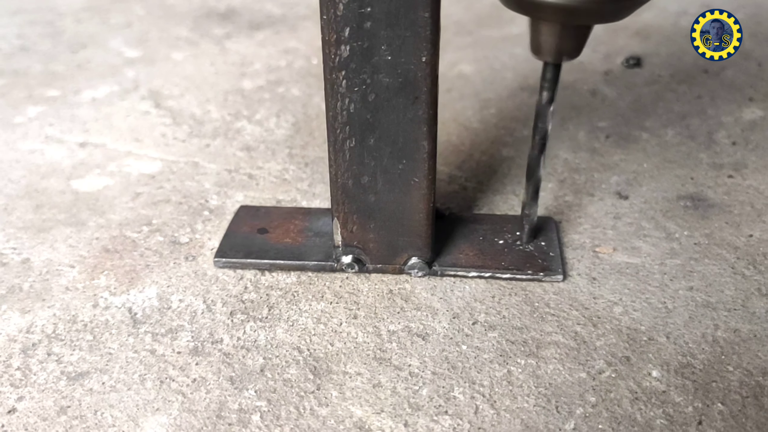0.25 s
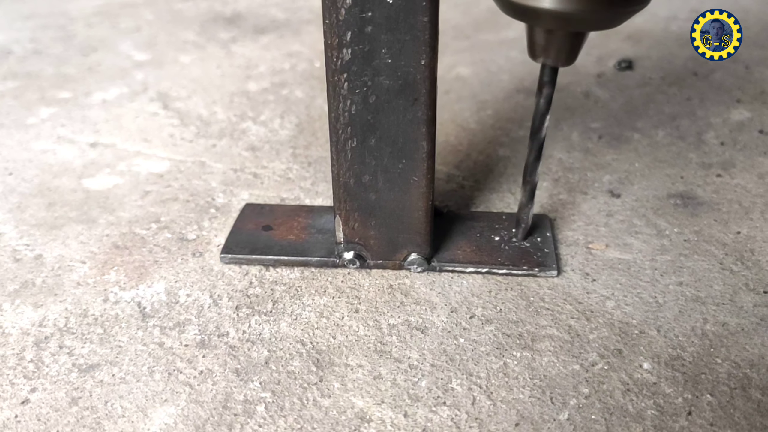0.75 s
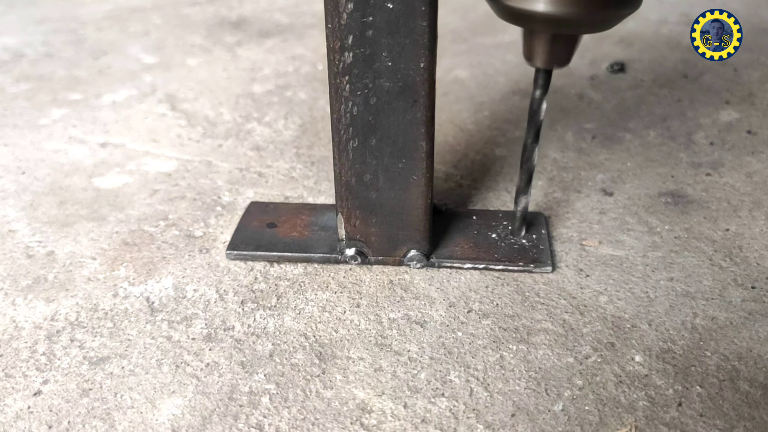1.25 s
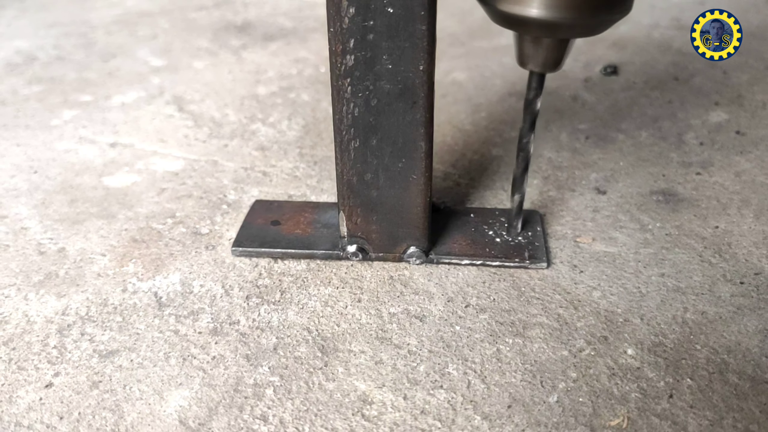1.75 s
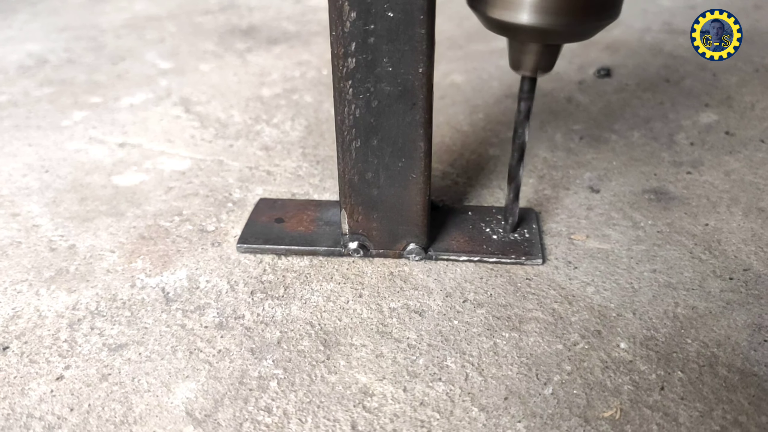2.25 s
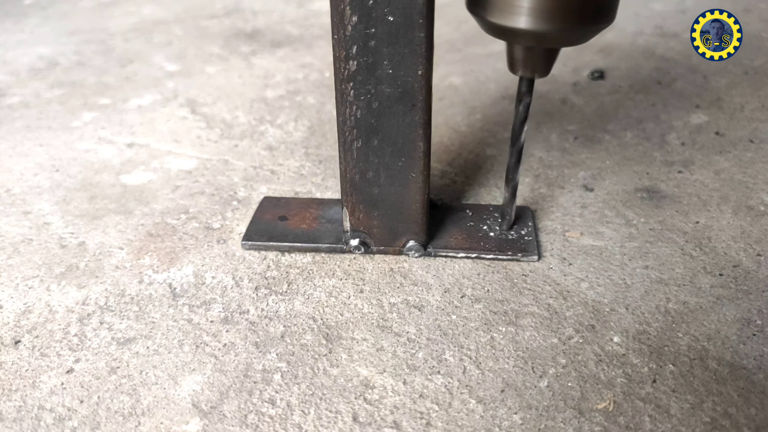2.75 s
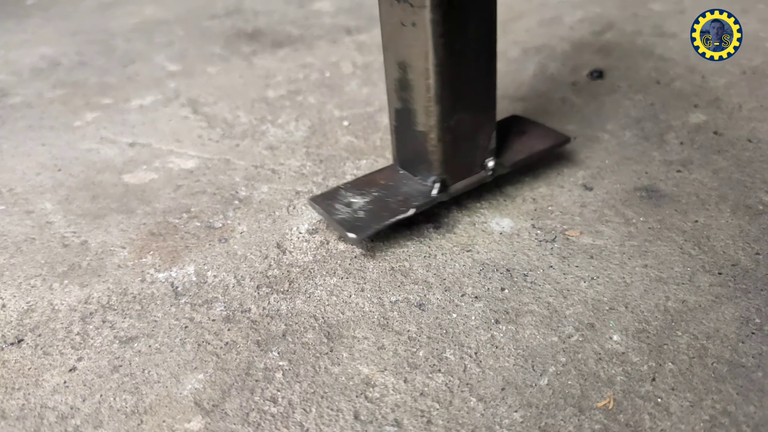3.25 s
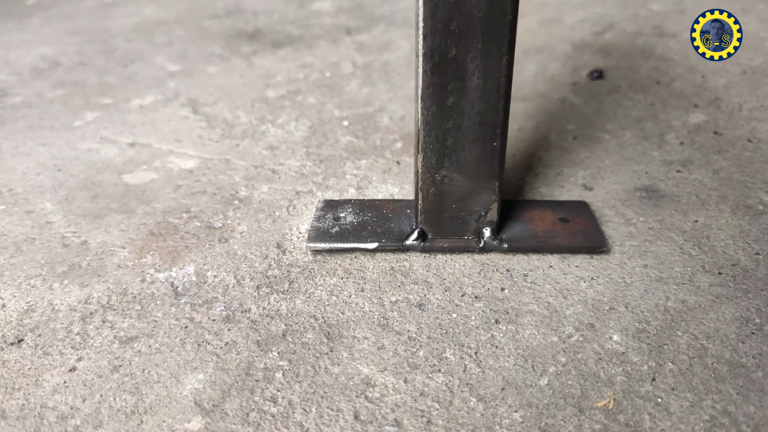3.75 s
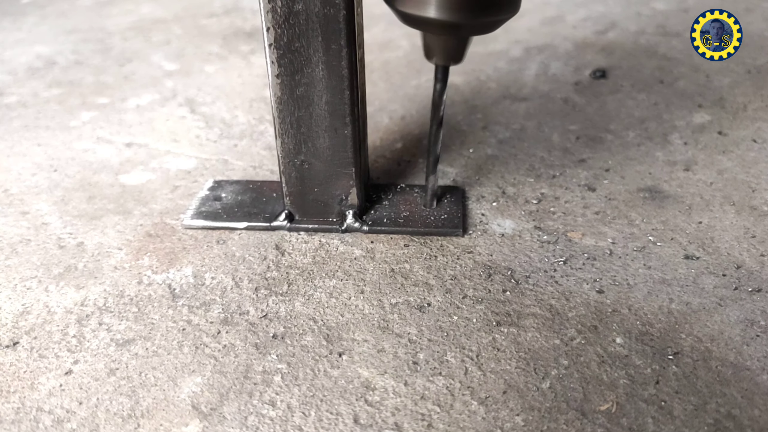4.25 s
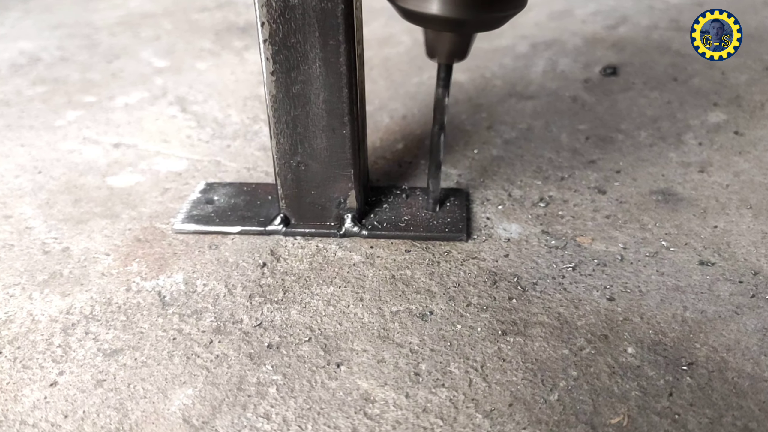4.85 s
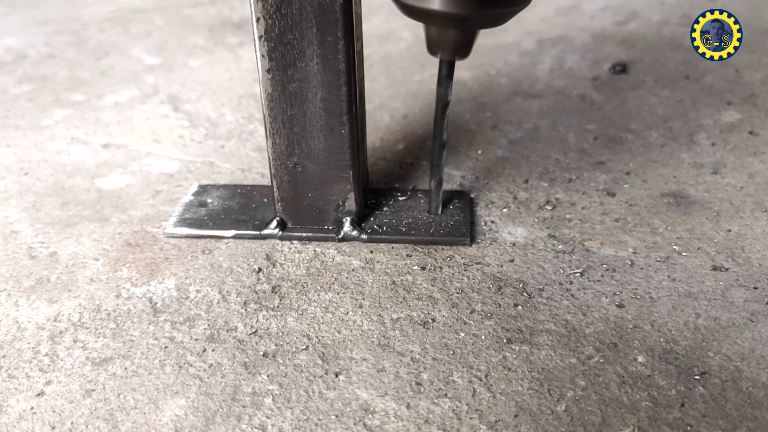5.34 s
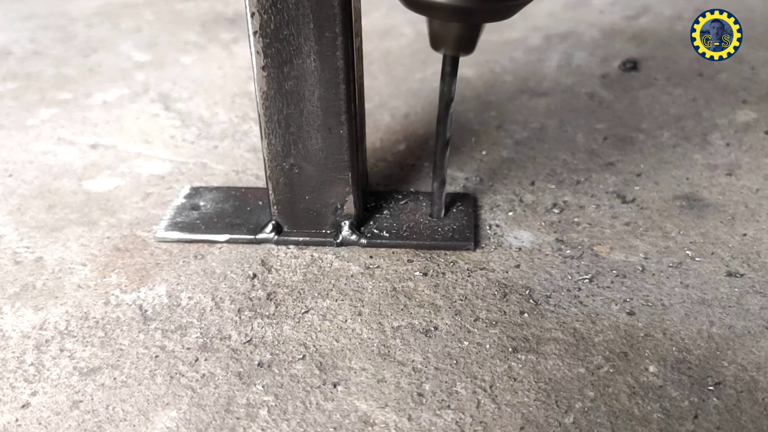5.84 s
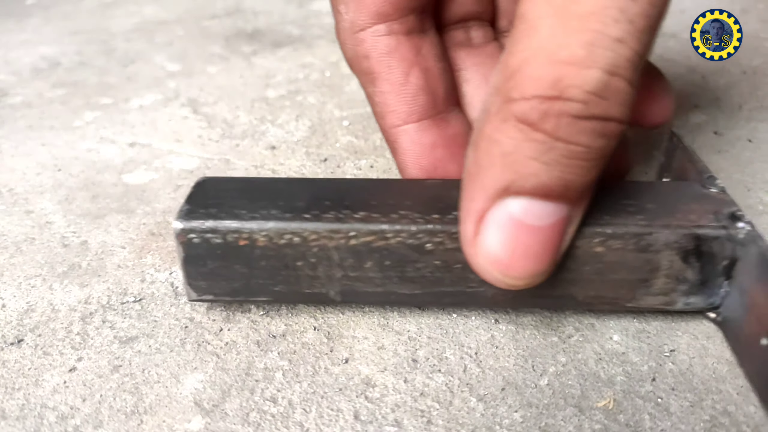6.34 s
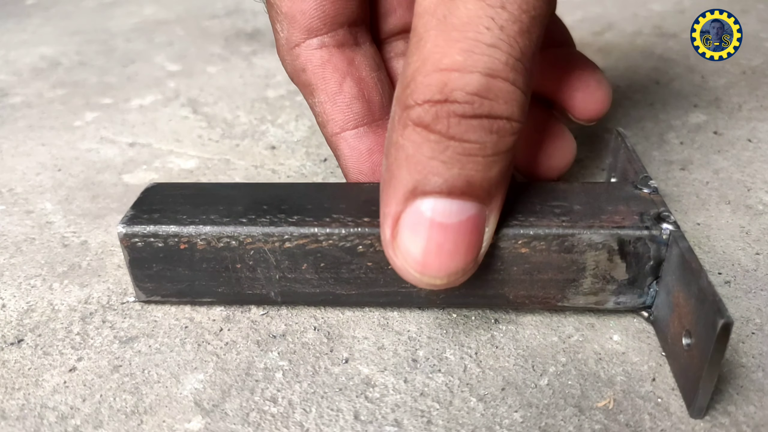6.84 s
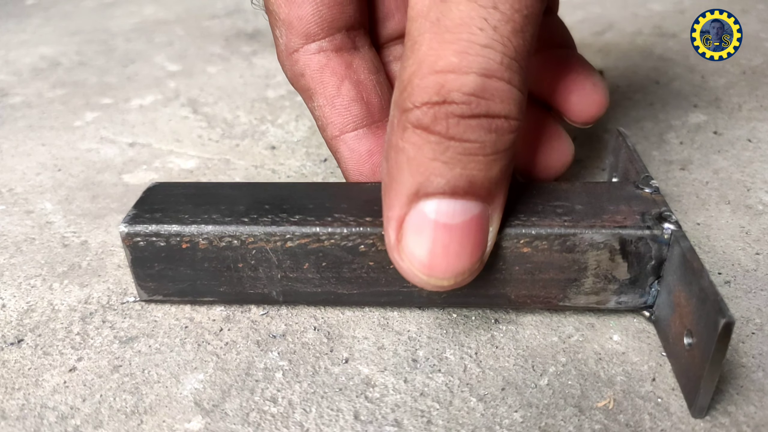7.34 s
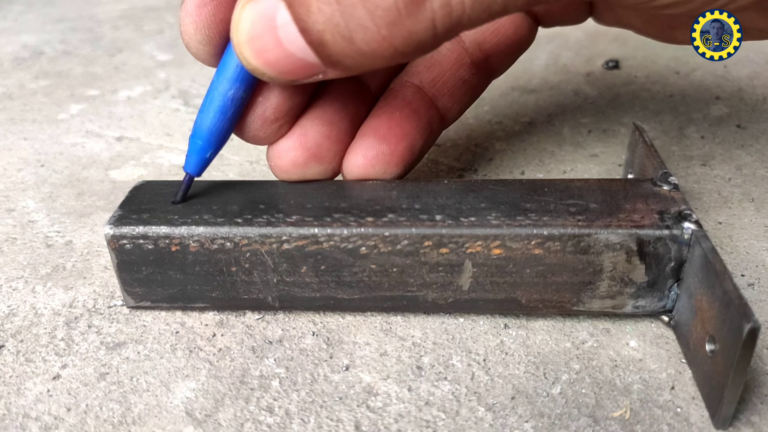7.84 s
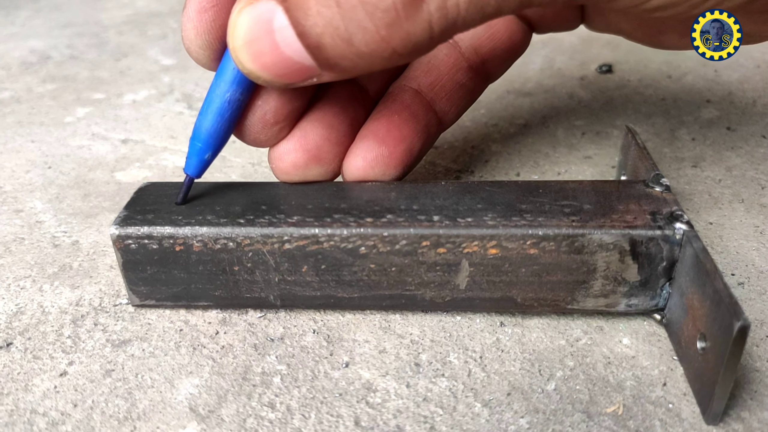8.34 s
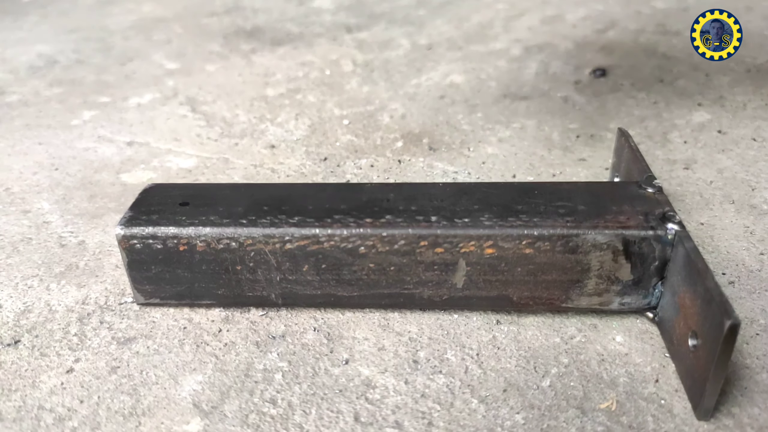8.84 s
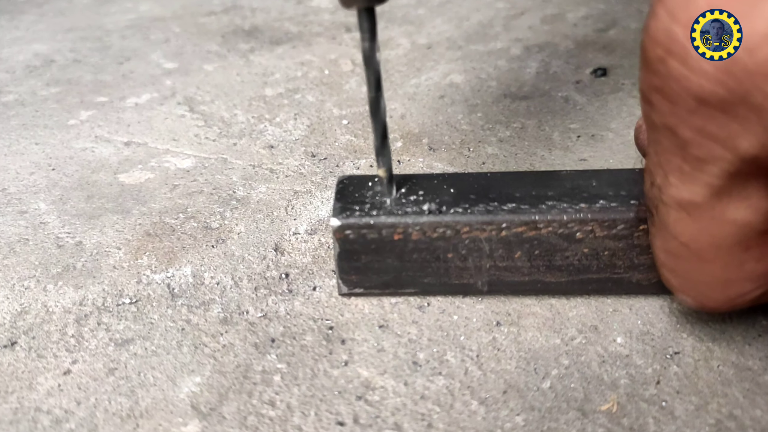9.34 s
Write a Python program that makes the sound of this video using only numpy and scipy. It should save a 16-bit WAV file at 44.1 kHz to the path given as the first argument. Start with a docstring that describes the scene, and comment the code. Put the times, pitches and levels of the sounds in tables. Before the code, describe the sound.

In a quiet workshop with faint hiss and low rumble, a mains hand drill close to the microphone bores steel with a steady whining roar. It cuts out, the piece knocks and rings on concrete, then a louder, faster, higher bore squeaks repeatedly. Sharp clacks follow, then near silence with a thin scrape, a faint distant whirr, and a third run-up cut off while turning.

```python
"""A quiet workshop, a two-port microphone close by: hiss and low rumble, then a handheld mains drill
bores a first hole in a welded steel piece on a concrete floor: rotor orders and whine over noise for the roar.
The piece is set down in cracks and rings; a faster second hole squeaks as the bit's edge slips.
More touches follow, a faint scrape with a thin squeal, and a far whirr with the answer of the walls.
The drill runs up into a third hole, with a singing tone and squeaks, and is still turning at the end."""
import sys
import numpy as np
from scipy import signal
from scipy.fft import rfft, irfft, next_fast_len
from scipy.io import wavfile
from scipy.ndimage import uniform_filter1d, map_coordinates

SR = 44100
rng = np.random.default_rng(int(sys.argv[2]) if len(sys.argv) > 2 else 0)


def dump(signal):
    """Clip the signal to [-1, 1] and save it as 16-bit WAV at the path in sys.argv[1]."""
    limited = np.clip(np.atleast_2d(signal).T, -1, 1)
    pcm = np.round(limited * 32767).astype(np.int16)
    wavfile.write(sys.argv[1], SR, pcm)


N = 422919  # samples


def amp(db):
    """dB to gain."""
    return 10 ** (np.asarray(db) / 20)


def unit(x):
    """x at rms 1."""
    return x / np.sqrt(np.mean(x ** 2) + 1e-20)


def along(points, hz):
    """(f/Hz, value) points read on a log frequency axis."""
    f, v = np.transpose(points)
    return np.interp(np.log(hz + 1), np.log(f + 1), v)


def sides(pan_db):
    """Left and right gains of a left-right difference, keeping their mean at 1."""
    pair = amp([pan_db / 2, -pan_db / 2])
    return pair / pair.mean(axis=0)


def wobble(rate, count):
    """A smooth random curve of count samples, rate knots a second."""
    knots = rng.standard_normal(int(count * rate / SR) + 4)
    return map_coordinates(knots, [np.arange(count) * rate / SR])


def filtered(x, response):
    """x times a response of frequency."""
    m = next_fast_len(x.shape[-1] + 8192)
    return irfft(rfft(x, m) * response(np.fft.rfftfreq(m, 1 / SR)), m)[..., :x.shape[-1]]


def rush(count, gain, alike, lean, patchy_db):
    """Stereo noise, mean of the ports at rms 1, with random gain in patches of time and frequency."""
    z = signal.stft(rng.standard_normal((2, count + 512)), nperseg=512)[2]
    field = uniform_filter1d(rng.standard_normal(z.shape[1:]), size=5, axis=0)
    field = uniform_filter1d(field, size=10, axis=1)
    pair = signal.istft(z * amp(patchy_db * unit(field)), nperseg=512)[1][:, :count]

    def shared_and_opposed(hz):
        # a noise common to both ports, and one of opposite sign in them, set the likeness
        turn = np.arccos(np.clip(along(alike, hz), -.95, .99)) / 2
        return gain(hz) * np.array([np.ones_like(hz), np.tan(np.minimum(turn, 1.1))])

    same, other = filtered(pair, shared_and_opposed)
    ports = np.array([same + other, same - other])
    both = filtered(ports, lambda hz: sides(along(lean, hz)))
    return both / np.std(both.mean(axis=0))


def placed(rows):
    """First sample, end sample, times and one value per sample for each column."""
    s, *cols = np.transpose(rows)
    start, stop = round(s[0] * SR), min(round(s[-1] * SR), N)
    t = np.arange(start, stop) / SR
    return start, stop, t, [np.interp(t, s, c) for c in cols]


def set_in(x, start, stop):
    """A stereo stretch at its place in the whole length."""
    return np.pad(x, ((0, 0), (start, N - stop)))


def tone(phase, pan_db, lead):
    """A tone of rms 1 in the mean of both ports, which hear it at different strength and phase."""
    pair = amp([pan_db / 2, -pan_db / 2]) * np.exp(.5j * np.array([lead, -lead]))
    return np.sqrt(2) * np.real((pair / abs(pair.mean()))[:, None] * np.exp(1j * phase))


def glide(rows, waver, pan_db, lead):
    """A single tone on a curve of pitch and level, its phase wavering."""
    start, stop, t, (hz, db) = placed(rows)
    phase = 2 * np.pi * np.cumsum(hz) / SR + waver * wobble(90, len(t))
    eased = amp(db) * signal.windows.tukey(len(t), .1)
    return set_in(eased * tone(phase, pan_db, lead), start, stop)


# spectrum shape of workshop and microphone hiss: (f/Hz, relative level/dB per Hz)
QUIET = [(12, -30.5), (20, -1.5), (53, -1.5), (74, -14.5), (107, -3), (198, -22.5), (240, -14), (284, -24),
         (457, -22), (600, -30.5), (1100, -35), (2300, -37.5), (4000, -42.5), (10000, -48.5), (13000, -44),
         (16000, -43)]
# how alike the ports hear the room: (f/Hz, likeness)
QUIET_ALIKE = [(60, 0.78), (180, 0.9), (550, 0.41), (1650, -0.04), (4970, -0.05), (15000, -0.01)]
# which port hears it stronger: (f/Hz, left-right level/dB)
QUIET_LEAN = [(60, 2.5), (180, 2), (550, 1.5), (1650, 2.5), (4970, 0.0), (15000, 0.5)]
# spectrum shape of the extra opening hiss: (f/Hz, relative level/dB per Hz)
OPENING = [(300, -20), (1000, 2), (5000, -4), (16000, -9)]
QUIET_DB, OPENING_DB = -64, -74
OPENING_S = .17  # the hiss is brighter until the first hole starts


def workshop():
    """Low far rumble, as shaped noise that swells a little, over steady hiss."""
    level = amp(QUIET_DB + .3 * wobble(2.7, N))
    room = level * rush(N, lambda f: amp(along(QUIET, f)), QUIET_ALIKE, QUIET_LEAN, patchy_db=1.84)
    count = round(OPENING_S * SR)
    hiss = rush(count, lambda f: amp(along(OPENING, f)), QUIET_ALIKE, QUIET_LEAN, patchy_db=1.0)
    return room + set_in(amp(OPENING_DB) * hiss, 0, count)


# spectrum shape of each hole's roar, before the BODY peaks: (f/Hz, relative level/dB per Hz)
FIRST_ROAR = [(24, -55), (40, -29.5), (179, -11.5), (229, -2.5), (350, -16.5), (548, -2.5), (797, -9),
              (859, -7), (2160, -7.5), (2510, -10), (3220, -10), (5050, -12), (5440, -11.5), (7520, -14),
              (15500, -17)]
SECOND_ROAR = [(24, -55), (40, -25.5), (174, -15.5), (235, -9.5), (461, -11.5), (722, -4), (881, -8),
               (1250, -5.5), (1410, -5), (2220, -8), (3560, -5.5), (8520, -9), (9410, -11), (13000, -10),
               (15500, -17.5)]
THIRD_ROAR = [(24, -51), (40, -16), (202, -14), (273, -4.5), (359, -16.5), (509, -3.5), (881, -9.5),
              (1050, -4), (1220, -10.5), (1680, -7), (5580, -9.5), (7910, -10), (15500, -19)]
# which port hears the roar stronger: (f/Hz, left-right level/dB)
FIRST_LEAN = [(60, 4.5), (240, 5), (380, -0.5), (900, 8), (2000, 4), (2800, 2.5), (4200, 8.5), (5500, 0),
              (7400, -0.5), (8300, 4), (9000, 1.5), (10300, 9.5), (12500, 7.5), (15500, 14.5)]
SECOND_LEAN = [(60, 4.5), (240, 6), (380, 0), (1300, 7), (2000, 4.5), (2800, 1.5), (4200, 10), (5800, -1.5),
               (7800, -2.5), (9000, 6), (12000, 5), (12700, -0.5), (13900, 20), (15500, 24)]
THIRD_LEAN = [(60, 0), (1500, 5.5), (2600, 1), (4200, 6.5), (5800, -2), (7000, 0), (9000, 5.5), (13000, 5),
              (15500, 17)]
# how alike the ports hear the roar: (f/Hz, likeness)
FIRST_ALIKE = [(60, .8), (130, .96), (240, 0.86), (400, 0.8), (600, .9), (1300, 0.61), (1800, .3),
               (2600, -0.22), (4000, .15), (15000, .05)]
SECOND_ALIKE = [(60, .6), (130, 0.86), (240, 1), (380, .6), (600, 0.64), (1100, .6), (1500, .4),
                (3700, .45), (4300, .15), (15000, .05)]
THIRD_ALIKE = [(60, .75), (250, .85), (700, 0.6), (1200, 0.34), (2000, .2), (5500, -0.2), (15000, -0.17)]
# resonances of piece and drill body driven by the cut:
# (f/Hz, width/Hz, level over the roar/dB in the first, second, third hole)
BODY = [(242.5, 30, 6, 8.5, 1), (565, 87, 6, 7.5, 0.5), (1418, 60, 7, 0.5, 4), (1662, 90, 6.5, 3.5, 4),
        (2010, 97, -3, 4, 2), (2450, 120, 6.5, 3.3, 10.5), (3003.8, 160, 3.5, 6.5, 1),
        (3495, 380, -1, 4.5, -1.5), (4077, 520, 3, 5.5, 1), (4300, 100, 0.3, 0.3, 6),
        (7890, 400, 4.5, 3, 8), (11100, 150, 3, 1, -3), (12900, 500, 1.5, 2, 3)]
ROARS = [FIRST_ROAR, SECOND_ROAR, THIRD_ROAR]
LEANS = [FIRST_LEAN, SECOND_LEAN, THIRD_LEAN]
ALIKES = [FIRST_ALIKE, SECOND_ALIKE, THIRD_ALIKE]
GEAR = 9.5  # rotor turns for each pass of a cutting edge
ROAR_TOP_HZ = 15570


def roar(hole, turns, roar_db, edge_db):
    """Fan, brushes and cutting: noise through the body's resonances, pulsing with the rotation."""
    def gain(f):
        peaks_db = sum(row[2 + hole] / (1 + (2 * (f - row[0]) / row[1]) ** 2) for row in BODY)
        return amp(along(ROARS[hole], f) + peaks_db) * (f < ROAR_TOP_HZ)

    noise = rush(len(turns), gain, ALIKES[hole], LEANS[hole], patchy_db=1.0)
    sparks_db = 0.87 * np.cos(4 * np.pi * turns)  # brushes spark twice a turn
    bites_db = edge_db * np.cos(2 * np.pi * turns / GEAR)  # an edge bites once a pass
    return amp(roar_db + sparks_db + bites_db + 0.23 * wobble(9, len(turns))) * noise


# rotor tones, one family under each leader: (rotor order, steps of the mains throb, level re leader/dB,
# left-right level/dB, left lead/rad); order and steps are rounded to whole numbers
FIRST_TONES = [
    [(4, 0.00054, 0.5, 9.5, 0), (1, 0, -5.5, 3.5, -.4), (5, 0, -4.5, 12, -.1)],
    [(12, 0, 1.5, 3, 2.65), (12, 1, -12.5, 5, 1.1), (12, 2, -10, 3.5, 1.2)],
    [(12, -1, 0, 9, 2.7)],
    [(12, -2, 0, 9.5, 3.36)],
    [(24, 0, 1, 4.5, -.2), (24, -1, -22.5, 8, -.4), (24, 1, -21.5, 5.5, -.5)],
    [(36, 0.00081, 0.5, -13.5, 2), (41, 0.0012, -10, 12.5, -1.5)],
    [(48, 0, 0.5, 17, -1), (46, 0.00026, -20.5, 13, -3.5)],
    [(60, 0.00027, 3.5, 14, -2), (58, 0.00031, -9.5, 14.5, -2)],
    [(72, 0.00077, 1, 17.5, -1.7), (63, 0, -9, 12.5, .4)],
]
SECOND_TONES = [
    [(1, 0, 0.0021, -5, -1.4)],
    [(2, 0, 0.0024, 6.03, -.4)],
    [(4, 0, 0, 11, -.3), (12, 0, -8, 4, -.2)],
    [(5, 0, 1.5, 6, -.6)],
    [(10, 0, 0.00018, 5, -.2)],
    [(24, 0.00054, 1, 11.5, 2), (21, 0.00039, -10, -7.5, 0), (23, 0.0049, -13, -0.5, -1.2)],
    [(36, 0, 1.5, 12, -1.5), (38, 0.00069, -16.5, 17, -2), (34, 0, -17, 7, 0)],
]
THIRD_TONES = [
    [(4, 0, 0, 6, -1.1), (1, 0, -3, 7, -.1), (6, 0, -8, 5, -.5)],
    [(12, 0, 2, 3, 2.5)],
    [(24, 0, 3, 3, 2.5)],
    [(36, 0, 3, 6, -.3)],
    [(48, 0, 4, 9, -1.3), (60, 0, 0, 12, -1.9)],
]
# speed at which each leader meets a resonance and is loudest: (rotor turns per s)
FIRST_BEST = [214, 214, 213.1, 224, 217.5, 215, 221.5, 215.6, 214.2]
SECOND_BEST = [358.5, 361, 355.5, 360, 364.6, 361.4, 365.3]
THIRD_BEST = [216, 263, 235, 235, 275]
# each leader around that speed: (level there re hole level/dB, loss/dB per turn/s faster,
# loss/dB per turn/s slower, most loss/dB)
FIRST_SWELL = [(-15, 0.8, 5, 13), (-12.5, 2, 2, 6), (-9, 9, 1.5, 9), (-15, 1, 3, 20), (-9.5, 1.5, 0.17, 13),
               (-11, -0.7, -1, 2), (-8.5, 0.8, 1, 16), (-12.5, 6, 6, 32), (-14, 13.5, 3.5, 32.5)]
SECOND_SWELL = [(-24, 0.3, 1.5, 7), (-17, 1.2, 1, 8), (-13.5, 0.17, 2.5, 5), (-16.5, 0.3, 1.2, 10),
                (-21.5, 1, 2.5, 14), (-16, 0.4, 4, 16), (-13, 1, 1.5, 13)]
THIRD_SWELL = [(-16.5, 0.017, 0.4, 9), (-15.5, 0.8, 0.05, 16), (-17, 0.04, 0.3, 6), (-13.5, 0.05, 0.5, 9.8),
               (-20.5, 0.8, 0.1, 5)]
# slow drift of the leaders, one value a hole: (scale/dB)
WANDER_DB = [1.5, 0.7, 0.7]
# quick unsteadiness of the leaders, one value a hole: (scale/dB)
FLICKER_DB = [0.5, 0.3, 2.5]
# brief dips of a leader's family: (t/s, leader number from 0, half length/s, level change/dB)
DROPS = [(0.3, 2, .05, -6), (0.8, 1, 0.053, 0), (1.36, 2, 0.11, -9.5), (2.2, 2, .04, -12),
         (2.402, 1, .07, -13.5), (5.15, 1, .1, -5), (5.7, 1, .15, -5)]
TONES = [FIRST_TONES, SECOND_TONES, THIRD_TONES]
BESTS = [FIRST_BEST, SECOND_BEST, THIRD_BEST]
SWELLS = [FIRST_SWELL, SECOND_SWELL, THIRD_SWELL]
THROB_HZ = 100


def rotor_tones(hole, t, speed, turns, shake):
    """Rotor orders and commutator whine: multiples of the rotation, offset by the mains throb."""
    count, sound = len(t), 0
    turns = turns + shake * wobble(25, count)  # the load shakes the rotor: higher orders blur more
    for k, (family, best, swell) in enumerate(zip(TONES[hole], BESTS[hole], SWELLS[hole])):
        top_db, fast_db, slow_db, most_db = swell
        lost_db = np.maximum(fast_db * (speed - best), slow_db * (best - speed))
        leader_db = top_db - np.minimum(lost_db, most_db)
        leader_db += WANDER_DB[hole] * wobble(5, count) + FLICKER_DB[hole] * wobble(50, count)
        for s, who, half, db in DROPS:
            if round(who) == k:
                leader_db += db * np.exp(-((t - s) / half) ** 2)
        for order, step, db, pan_db, lead in family:
            cycles = round(order) * turns + round(step) * THROB_HZ * t + rng.random()
            level = amp(leader_db + db + 1.2 * wobble(12, count))
            sound = sound + level * tone(2 * np.pi * cycles, pan_db, lead)
    return sound


# the drill's run in each hole: (t/s, rotor turns per s, level/dB of roar and tones before their own trims)
FIRST = [(0.15, 228.0, -28.1), (0.45, 222.5, -28.1), (0.6, 219.9, -27.5), (0.75, 217.9, -27.6),
         (1.05, 215.0, -27.8), (1.2, 214.2, -28.2), (1.4, 214.1, -28), (1.6, 213.6, -28.3),
         (2.0, 213.5, -27.8), (2.2, 214.1, -28.2), (2.35, 213.6, -27.8), (2.7, 213.0, -27.3),
         (2.9, 213.2, -27.2), (3.21, 213.2, -28)]
SECOND = [(4.15, 353.4, -21.0), (4.3, 355.3, -21.0), (4.6, 357.7, -21.6), (4.75, 359.9, -21.7),
          (4.9, 361.4, -21.0), (5.05, 362.0, -20.6), (5.4, 364.3, -20.4), (5.8, 365.5, -20.5),
          (6.2, 365.0, -20.0), (6.35, 365.2, -20.5), (6.54, 364.6, -20.6)]
THIRD = [(9.17, 128.0, -29.5), (9.21, 142.0, -29.5), (9.25, 164.0, -29.5), (9.29, 191.0, -29.5),
         (9.37, 235.0, -27.6), (9.41, 251.0, -27.1), (9.45, 265.0, -26.9), (9.53, 285.0, -25.4),
         (9.59, 293.0, -23.9)]
# fade of each hole, one row a hole: (silent t/s, full t/s, still full t/s, silent again t/s)
FADES = [(.162, .35, 3.03, 3.1856), (4.16, 4.39, 6.43, 6.54), (9.185, 9.33, 9.7, 9.8)]
RUNS = [FIRST, SECOND, THIRD]


def drill(hole, roar_db, edge_db, bend, shake):
    """One hole, numbered from 0: roar and tones tied to the same turning rotor."""
    start, stop, t, (speed, level_db) = placed(RUNS[hole])
    turns = np.cumsum(speed) / SR
    sound = roar(hole, turns, roar_db, edge_db) + rotor_tones(hole, t, speed, turns, shake)
    fade = np.interp(t, FADES[hole], [0, 1, 1, 0]) ** bend
    return set_in(amp(level_db) * fade * sound, start, stop)


def ringing(modes, t):
    """Modes struck at new strengths; the rough floor under the piece blurs them."""
    out = 0
    for hz, db, t60 in modes:
        decay = amp(db + rng.normal(0, 2.5) - 60 * t / t60)
        out = out + decay * np.sin(2 * np.pi * hz * t + .6 * wobble(60, len(t)))
    return out


# the piece touches the floor: (t/s, level of the whole touch/dB, then within it treble/dB before a
# 2 dB cut, thud gain/dB, ring gain/dB; left-right level/dB)
KNOCKS = [(3.537, -38.5, -28, -11, -38, 2.5), (3.719, -63.5, -5, -6, -24, 1), (3.746, -60.5, 4, -8, -26, 3),
          (3.824, -41.5, -6, -26, -20, 2), (3.931, -49.5, -5, -18, -25, 1.5),
          (3.984, -60.5, -5, -14, -22, .6), (6.524, -45.5, -5, -13, 0, 5), (6.54, -50, -2.5, -12, -22, 3),
          (6.559, -36, -19, -20, -22, 4), (6.567, -33, -14, -23, -24, 3), (6.586, -43.5, -4, -18, -24, 0),
          (7.265, -58, 1, -8, -22, 3), (8.209, -70, -3, -7, -24, 3), (8.559, -81, -3, -8, -24, 3.5),
          (9.089, -68, 6, -12, -24, 7)]
# modes of the steel piece: (f/Hz, level/dB before a random strength, t60/s)
STEEL = [(1416, -11, .1), (1640, -10, .1), (1782, -9, .1), (2150, 1, .14), (2350, 0, .13), (2864, -8, .06),
         (3327, -14, .1), (6385, -18, .08), (6713, -16, .08), (7101, -17, .16), (8193, -16, .08)]
# modes of the tube rocking on its foot: (f/Hz, level/dB before a random strength, t60/s)
BASE = [(237, 4, 0.34), (463, -15.5, 0.33), (156, -23, .2)]


def knocks():
    """Every touch gives a gritty crack of noise, rings the steel and rocks the tube."""
    out, t = np.zeros((2, N + SR)), np.arange(SR // 2) / SR
    clack = signal.butter(2, [400, 3000], "band", fs=SR)
    grit = signal.butter(2, 4500, "high", fs=SR)
    for s, db, treble_db, thud_db, ring_db, pan_db in KNOCKS:
        a, b = rng.standard_normal((2, 2, len(t)))
        # each port hears its own noise and half of the other's
        crack = amp(0.5 - 60 * t / 0.038) * signal.lfilter(*clack, a + a[::-1] / 2)
        treble = amp(treble_db - 2.0 - 60 * t / 0.05) * signal.lfilter(*grit, b)
        crack = crack + np.minimum(t / .003, 1) * treble
        touch = crack + amp(ring_db) * ringing(STEEL, t) + amp(thud_db) * ringing(BASE, t)
        out[:, round(s * SR):][:, :len(t)] += amp(db) * sides(pan_db)[:, None] * touch
    return out[:, :N]


# how long the room answers: (f/Hz, t60/s)
WALLS = [(200, 0.66), (2000, 0.44), (5000, 0.22), (12000, .12)]


def walls(x):
    """The room's answer as decaying noise: each frequency dies at its own speed."""
    hz, t, z = signal.stft(rng.standard_normal((2, SR // 2)), SR, nperseg=256)
    decay = amp(-60 * t / along(WALLS, hz)[:, None])
    tail = signal.istft(z * decay, SR, nperseg=256)[1]
    return signal.fftconvolve(x, tail / np.linalg.norm(tail[0]), axes=1)[:, :N]


# the loudest slips of the cutting edge: (t/s, peak level/dB)
SQUEAKS = [(4.2872, -25), (4.3157, -22), (4.3426, -19.5), (4.3691, -22.5), (4.397, -13.5), (4.4753, -15),
           (4.5292, -15), (4.6624, -20.5), (4.6873, -18.5), (4.7687, -21), (4.7936, -21.5), (4.821, -18),
           (4.8964, -19), (4.9517, -17.5), (5.0834, -16), (5.1892, -19.5), (5.2131, -16), (5.2401, -18.5),
           (5.2935, -19.5), (5.3448, -14), (5.3713, -17), (5.6576, -22), (5.7888, -20.5), (5.9964, -21),
           (6.2029, -19), (9.5044, -18.5), (9.5741, -17.5)]
# mean pitch of the squeak in the second and the third hole: (f/Hz)
BIT_HZ = [12700, 8140]
SLIP_DB, SLIP_SPREAD_DB = -27.5, 2.5  # faint slip at every pass of the edge in the second hole
PASS_LAG = .18  # share of a pass before the edge slips


def squeaks():
    """Each slip rings the bit for a few milliseconds, with a soft start."""
    out, t = np.zeros((2, N + SR)), np.arange(SR // 50) / SR
    _, _, clock, (speed, _) = placed(SECOND)
    pass_number = np.floor(np.cumsum(speed) / SR / GEAR - PASS_LAG)
    passes = clock[1:][np.diff(pass_number) > 0]
    passes = passes[(passes > FADES[1][0] + .1) & (passes < FADES[1][2])]
    faint = [(s, SLIP_DB + SLIP_SPREAD_DB * rng.standard_normal()) for s in passes]
    u = t / .0013  # the ring is strongest 1.3 ms after it starts
    for s, db in faint + list(SQUEAKS):
        in_third = int(s > SECOND[-1][0])
        hz = BIT_HZ[in_third] * (1 + .006 * rng.standard_normal())
        ring = u ** 2 * np.exp(2 - 2 * u) * np.sin(2 * np.pi * (hz * t + rng.random()))
        out[:, round(s * SR):][:, :len(t)] += amp(db) * sides(1.5)[:, None] * ring
    return out[:, :N]


# something slides over the steel: (t/s, squeal f/Hz, squeal level/dB, scrape level/dB)
SLIDE = [(7.43, 5900, -100, -95), (7.5, 7400, -92, -82), (7.55, 8500, -88, -79), (7.59, 9050, -85, -78),
         (7.65, 9050, -87, -81), (7.665, 9300, -95, -95)]
# spectrum peaks of the scrape: (f/Hz, width/Hz, relative level/dB)
SCRAPE = [(2500, 150, 0), (4500, 2500, -15), (1200, 1200, -10)]


def slide():
    """A faint scrape of noise in broad peaks, under a thin squeal that mostly rises."""
    start, stop, t, (db,) = placed([(s, scrape_db) for s, hz, squeal_db, scrape_db in SLIDE])

    def gain(f):
        return sum(amp(level) / (1 + (2 * (f - c) / w) ** 2) for c, w, level in SCRAPE)

    noise = rush(len(t), gain, QUIET_ALIKE, QUIET_LEAN, patchy_db=2.0)
    scrape = amp(db + 2 * wobble(60, len(t))) * noise
    squeal = glide([row[:3] for row in SLIDE], waver=.5, pan_db=4.0, lead=.3)
    return set_in(scrape, start, stop) + squeal


# the far whirr: (t/s, f/Hz, level/dB before the mix)
WHIRR = [(8.68, 1410, -102), (8.722, 1410, -82), (8.958, 1700, -79), (9.11, 1510, -79), (9.15, 1500, -100)]


def far_whirr():
    """A far whirr: one gliding tone whose phase wavers strongly."""
    return glide(WHIRR, waver=2.6, pan_db=6.0, lead=.8)


# a singing tone in the third hole: (t/s, f/Hz, level/dB)
SINGING = [(9.26, 2410, -66), (9.3, 2454, -33), (9.39, 2500, -38), (9.5, 2484, -56), (9.59, 2400, -36)]


def singing():
    """One tone that glides up and back down as the third hole starts."""
    return glide(SINGING, waver=.7, pan_db=2.5, lead=2.4)


def scene():
    """Three holes, the handling between them, and the room."""
    # roar_db trims the roar alone, edge_db is the bite, bend the fade's power, shake is in rotor turns
    holes = (drill(0, roar_db=-2.5, edge_db=0.4, bend=0.98, shake=.004)
             + drill(1, roar_db=-0.77, edge_db=0.16, bend=1.9, shake=.004)
             + drill(2, roar_db=-2.0, edge_db=1.0, bend=1.78, shake=.02))
    touches, whirr = knocks(), far_whirr()
    handling = touches + amp(-8.5) * walls(touches) + slide()
    far = amp(-6) * whirr + amp(-3) * walls(whirr)
    return workshop() + holes + handling + squeaks() + far + singing()


TOP_HZ = 16000


def record(dry):
    """The recorder keeps nothing above its band limit, reached over the last 100 Hz."""
    return filtered(dry, lambda hz: np.clip((TOP_HZ - hz) / 100, 0, 1) ** 2)


dry = scene()
out = record(dry)
dump(out)
```